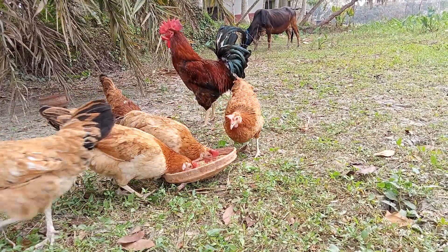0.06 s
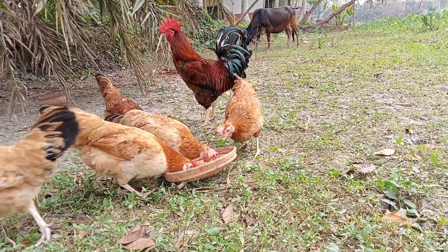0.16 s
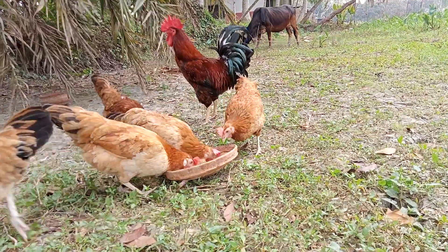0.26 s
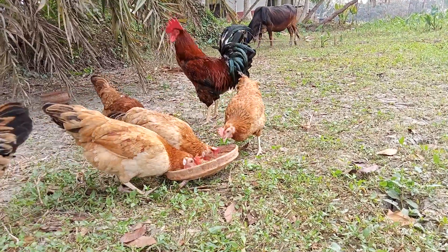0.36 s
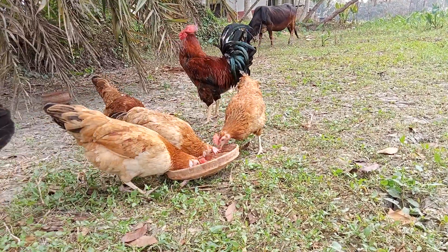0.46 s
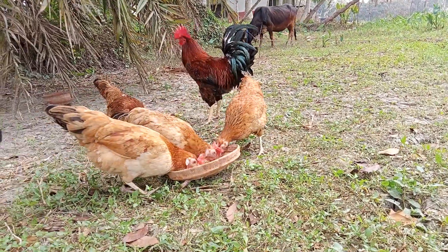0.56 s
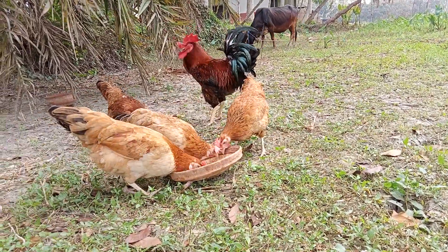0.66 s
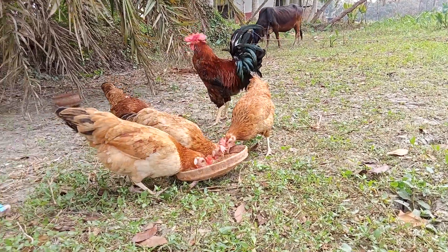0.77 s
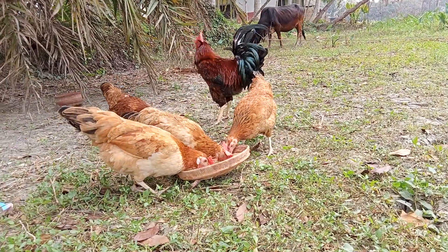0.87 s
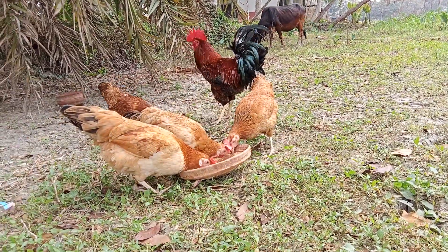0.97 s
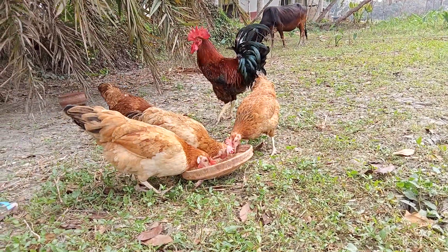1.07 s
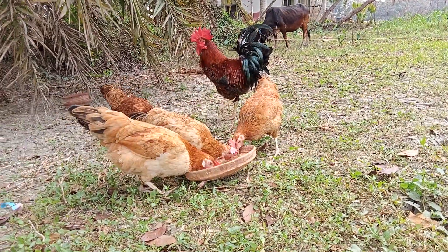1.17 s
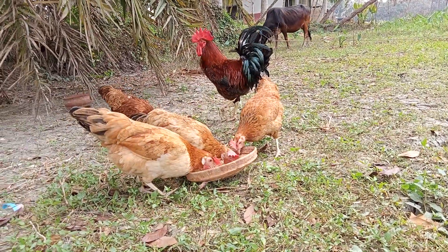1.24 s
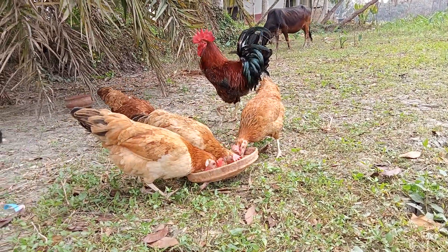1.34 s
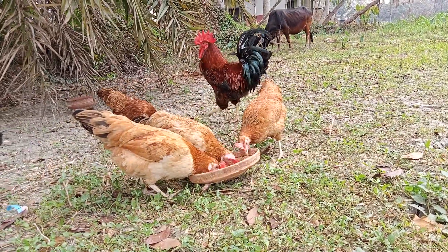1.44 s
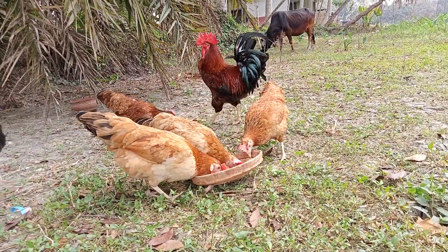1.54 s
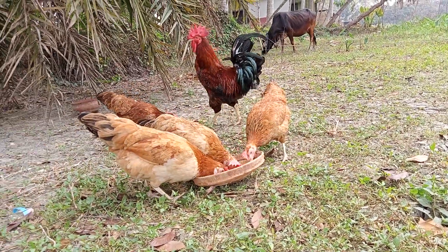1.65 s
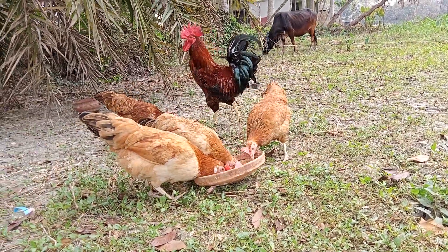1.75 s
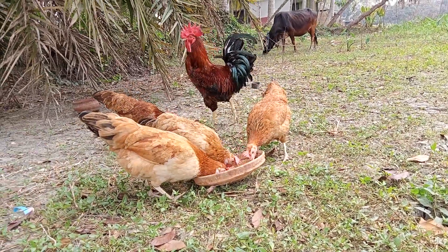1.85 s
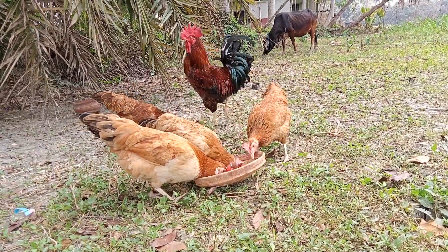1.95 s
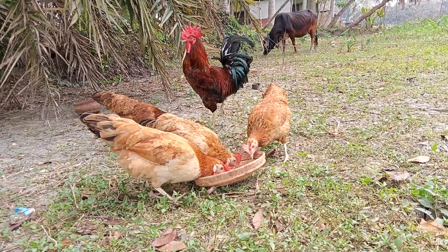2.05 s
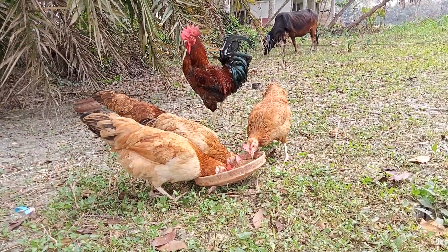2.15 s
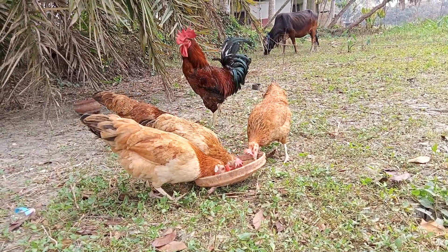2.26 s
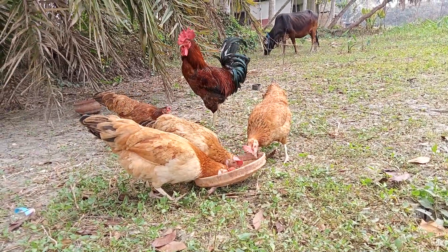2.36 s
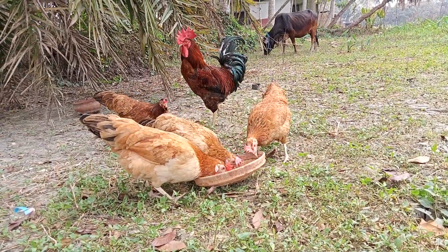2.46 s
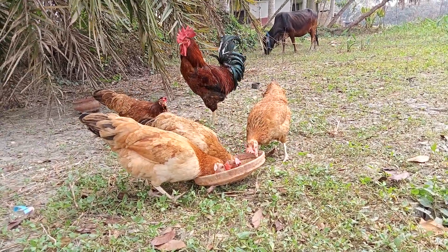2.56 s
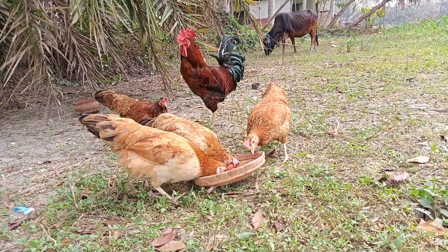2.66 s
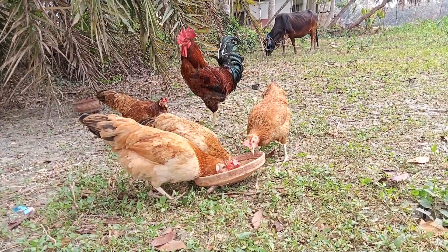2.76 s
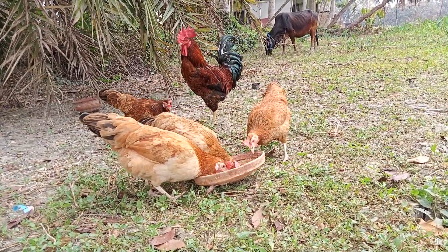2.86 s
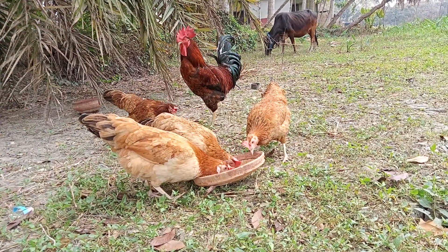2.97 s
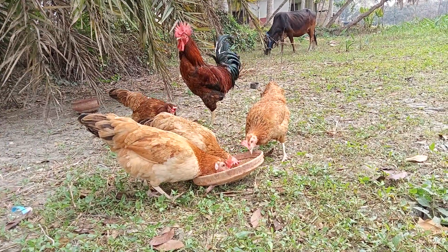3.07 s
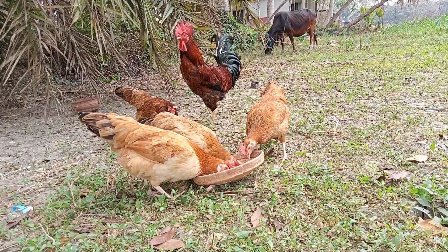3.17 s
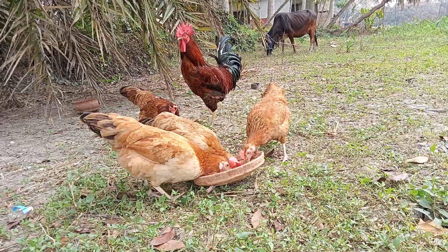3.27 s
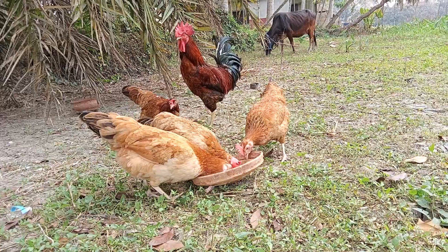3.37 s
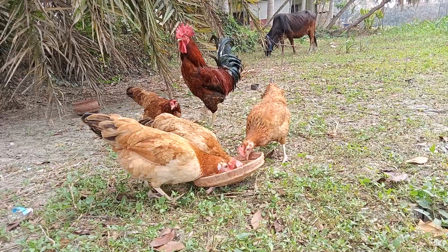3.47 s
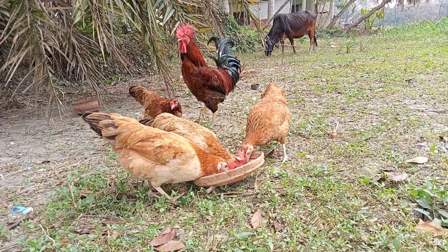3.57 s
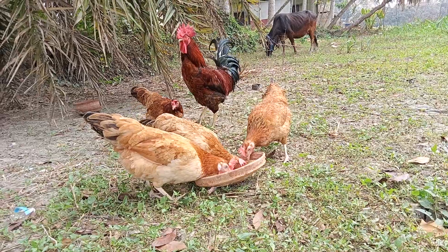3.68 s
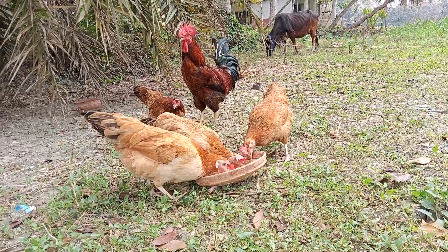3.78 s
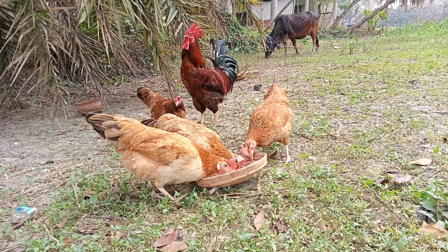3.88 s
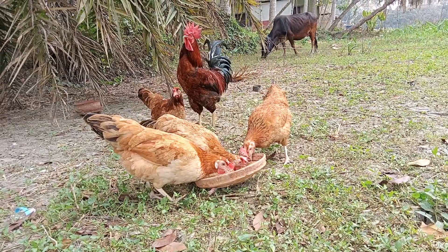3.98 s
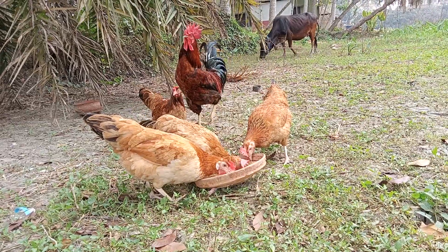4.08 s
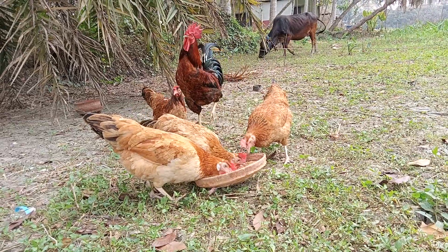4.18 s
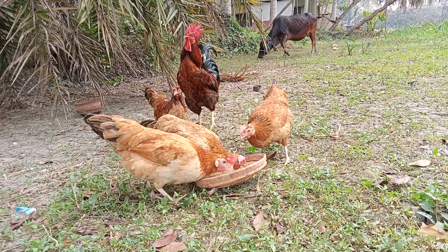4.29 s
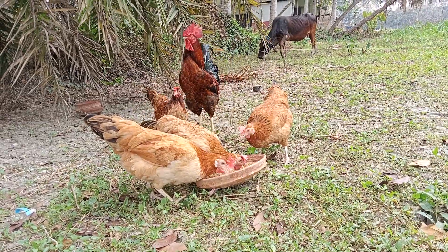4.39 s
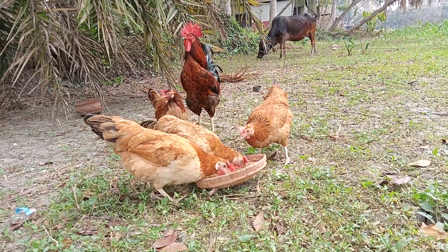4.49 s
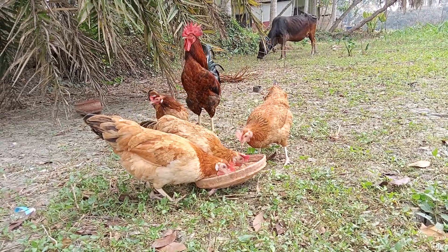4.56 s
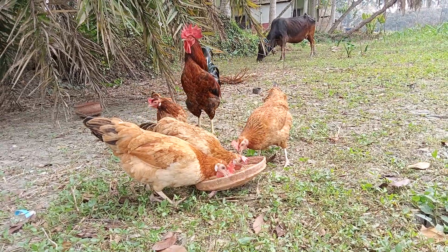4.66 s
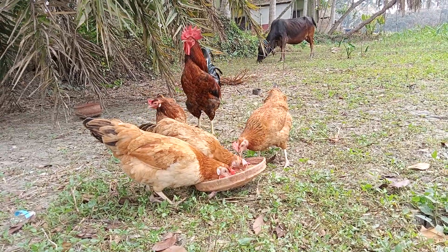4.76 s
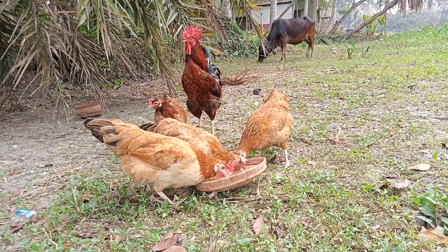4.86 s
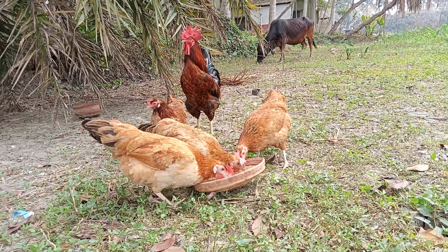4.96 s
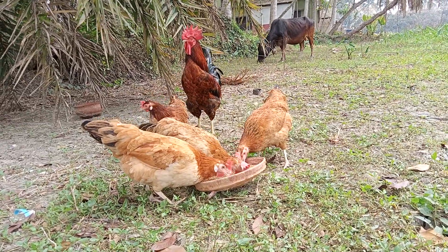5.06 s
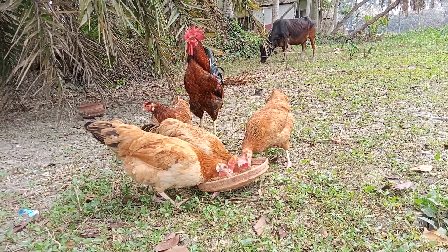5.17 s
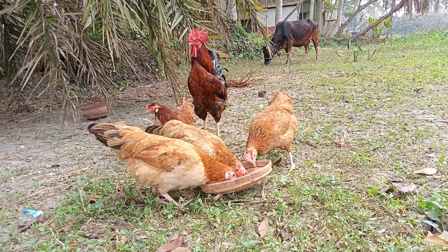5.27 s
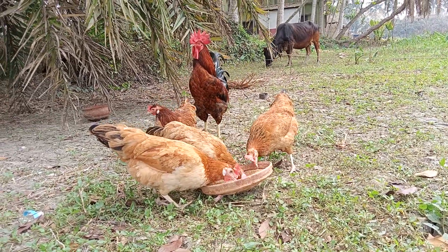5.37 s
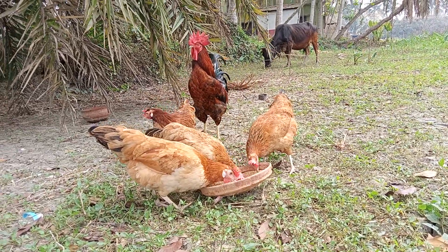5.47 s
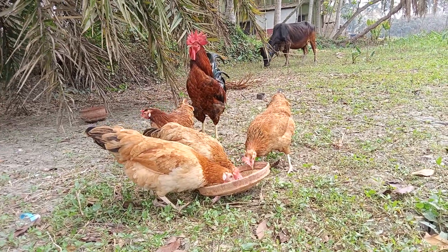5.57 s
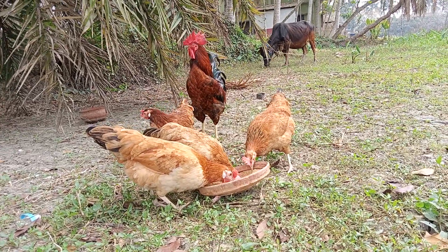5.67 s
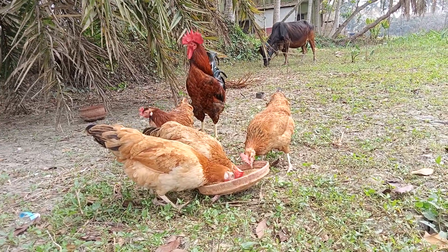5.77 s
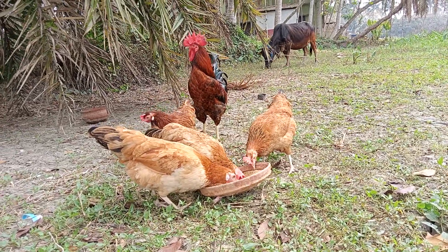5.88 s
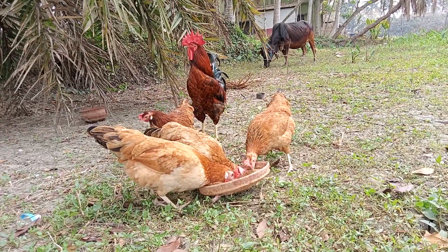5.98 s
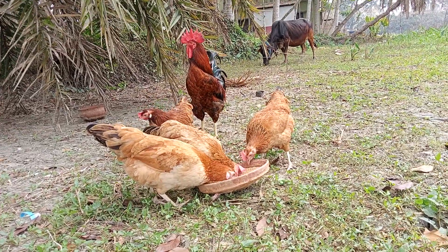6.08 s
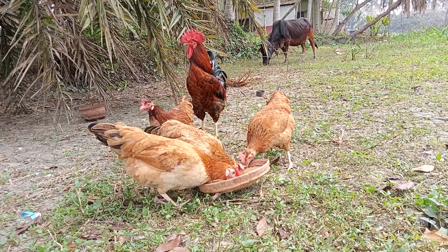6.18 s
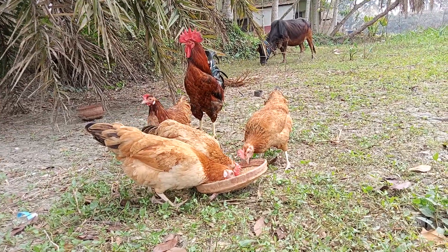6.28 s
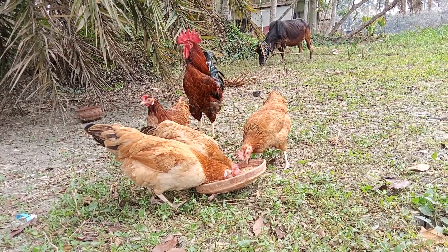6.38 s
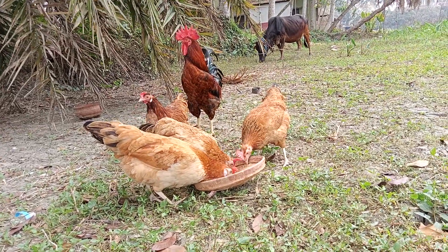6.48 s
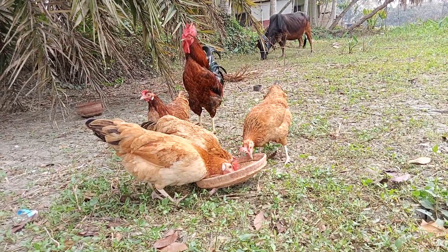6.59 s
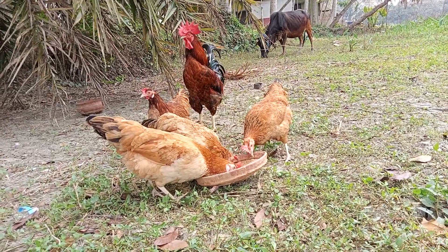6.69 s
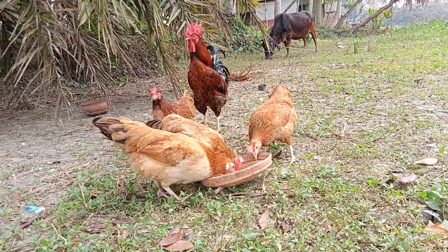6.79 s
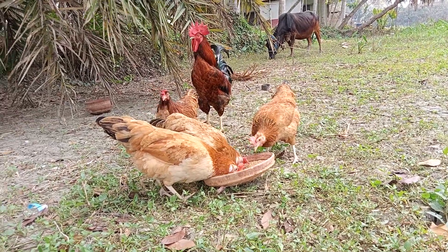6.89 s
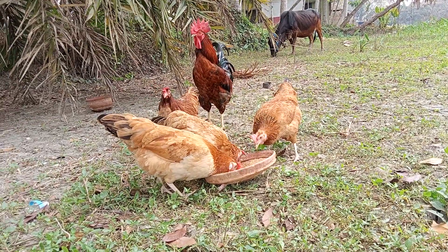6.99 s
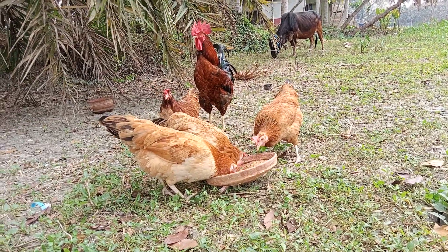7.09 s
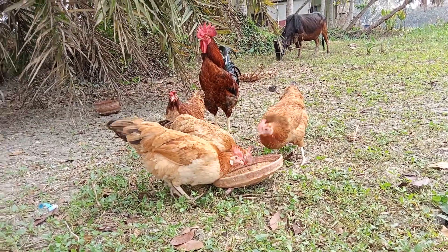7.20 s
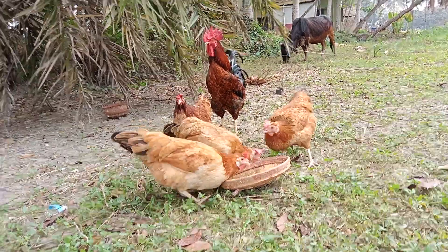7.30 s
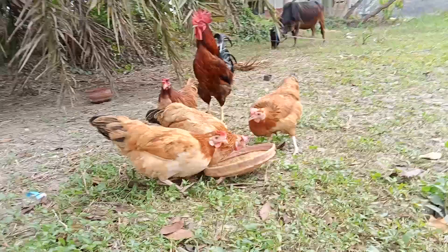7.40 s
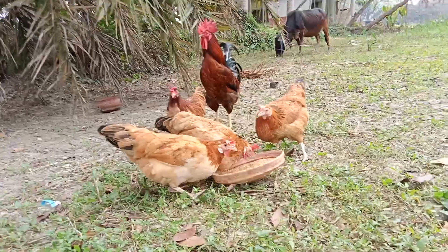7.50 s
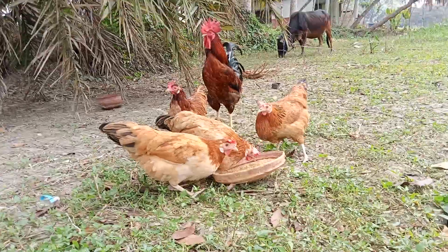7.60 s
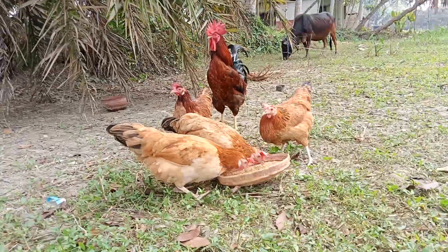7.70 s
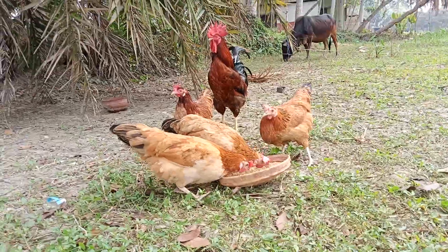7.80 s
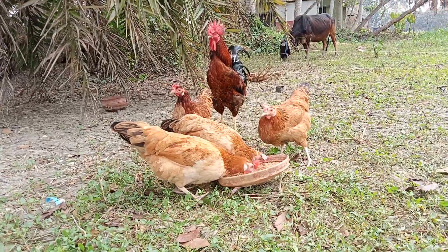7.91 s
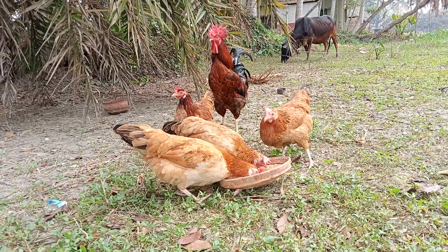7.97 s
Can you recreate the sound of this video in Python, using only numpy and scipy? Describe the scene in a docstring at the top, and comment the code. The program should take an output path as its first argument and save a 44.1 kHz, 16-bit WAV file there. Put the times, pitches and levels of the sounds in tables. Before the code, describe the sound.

Hens peck at feed in a clay bowl and scuff through dry grass, making light taps and crackles. A young bird gives raspy, falling peeps about once a second, while a far bird repeats a quick three-note call and a slow engine chugs faintly. One hen clucks softly. The pecking sharpens midway, and near the end a short thump hits the microphone, followed by busier rustling and peeps.

```python
"""In a yard, hens rustle through dry grass and peck at a clay feed bowl; one gives a low cluck.
A young bird peeps in falling whistles, made raspy by a second, slower vibration in its voice box;
another bird adds a few lower peeps.
Far off a bird repeats a three-note call and a slow engine, perhaps a pump, chugs on.
Near the end something knocks the microphone, and its limiter turns the yard down for a moment."""
import sys
import numpy as np
from scipy import signal
from scipy.fft import rfft, irfft, next_fast_len
from scipy.io import wavfile
from scipy.ndimage import uniform_filter1d, minimum_filter1d

SR = 44100
rng = np.random.default_rng(int(sys.argv[2]) if len(sys.argv) > 2 else 0)


def unload_audio(sound):
    """Save the sound as a 16-bit wav file, at the path given as the first command line argument."""
    columns = np.transpose(np.atleast_2d(sound))
    # keep every value between -1 and 1, then stretch to whole-number steps
    steps = np.round(np.clip(columns, -1, 1) * 32767)
    wavfile.write(sys.argv[1], SR, steps.astype(np.int16))


N = 354563


def amp(db):
    """Turns decibels into a number to multiply by."""
    return 10 ** (np.asarray(db) / 20)


def unit(x):
    """Scales a sound to an average power of 1."""
    return x / np.sqrt(np.mean(x ** 2) + 1e-20)


def clock(length_s):
    """The time of each sample, in seconds."""
    return np.arange(int(length_s * SR)) / SR


def add(mix, start_s, sound):
    """Mixes a sound in at the given time."""
    part = mix[max(round(start_s * SR), 0):][:len(sound)]
    part += sound[:len(part)]


def colour(x, points):
    """Makes some frequencies stronger and others weaker, along (frequency_hz, level_db) points."""
    hz, db = np.transpose(points)
    size = next_fast_len(len(x))
    gain = amp(np.interp(np.log(np.fft.rfftfreq(size, 1 / SR) + 1), np.log(hz), db))
    return irfft(rfft(x, size) * unit(gain), size)[:len(x)]


def let_through(x, kind, hz, order=2):
    """Keeps the "low", "high" or "band" part of a sound; a higher order cuts more sharply."""
    return signal.sosfilt(signal.butter(order, hz, kind, fs=SR, output="sos"), x)


def drift(t, per_s):
    """A random wobble of about size 1 that heads for a new value per_s times a second."""
    return 1.34 * np.interp(t * per_s, np.arange(4096), rng.standard_normal(4096))


def ring(x, hz, width_hz):
    """Makes a sound ring at one pitch; a narrower width rings longer."""
    r = np.exp(-np.pi * width_hz / SR)
    return signal.lfilter([1 - r, 0, r - 1], [1, -2 * r * np.cos(2 * np.pi * hz / SR), r * r], x)


def outdoors(x, echo_db, fade_s):
    """Adds thin echoes from trees and walls. Here and below, fade_s is the time to fall by 60 dB."""
    t = clock(.6)
    echoes = rng.standard_normal(len(t)) * (rng.random(len(t)) < .04)
    tail = echoes * amp(-60 * t / fade_s) * (t > .006)
    return x + amp(echo_db) * signal.oaconvolve(x, tail / np.linalg.norm(tail))[:N]


# Tone of the air, with the microphone's high ring near 8.7 kHz: frequency_hz, level_db
AIR_AND_MIC_TONE = [(20, -28), (45, -9), (75, 13.5), (140, 11), (250, 5), (420, 0), (680, 0), (1300, 3),
                    (1900, 1.5), (3100, -0.5), (4200, -9.5), (5600, -24.5), (7600, -27), (8700, -16.5),
                    (10200, -39), (12500, -37), (16000, -27)]

def yard_air(level_db=-57.5):
    """The steady wash of the open yard, wavering a little."""
    loudness = amp(level_db + .89 * drift(np.arange(N) / SR, 7.4))
    return loudness * unit(colour(rng.standard_normal(N), AIR_AND_MIC_TONE))


# Two strokes and their echoes in each turn of the engine: delay_s, level_db
ENGINE_STROKES = [(-.004, 0), (0.018, -13), (0.033, -3.5), (0.066, -11)]
# The notes the exhaust pipe rings at: pitch_hz, level_db, fade_s
PIPE_NOTES = [(88.5, -11.5, 0.14), (141.2, -1.5, 0.13), (188.4, 4, 0.037), (230, -4, 0.023)]
# The tone of the rushing gas: frequency_hz, level_db
GAS_COLOUR = [(30, -57), (60, -16), (100, 5), (145, 2), (200, 2.5), (260, -4), (340, -14.5), (480, -18.5),
              (900, -42), (5000, -100)]
# Metal knocks in each turn: delay_s, level_db
VALVE_KNOCKS = [(.003, 2), (.031, 3.5), (.053, -1.5)]
# The notes the engine's metal case rings at: pitch_hz, width_hz, level_db
CASE_NOTES = [(760, 10.8, -70), (895.5, 33, -67.5), (971, 34, -72), (1406, 30, -71)]

def engine(exhaust_db=-53, turns_per_s=11.8835, gas_db=-5, gas_peak_s=.0073, uneven_db=1.13):
    """A slow one-cylinder engine: puffs of gas ring the exhaust pipe, and the valves rattle the case."""
    puffs, rattle, t = np.zeros(N), np.zeros(N), clock(.11)
    pipe = sum(amp(db - 60 * t / fade_s) * np.sin(2 * np.pi * hz * t) for hz, db, fade_s in PIPE_NOTES)
    pipe *= 1 - np.exp(-t / .0038)  # a soft start
    gas = unit(colour(rng.standard_normal(N + SR), GAS_COLOUR))
    swell = np.e * t / gas_peak_s * np.exp(-t / gas_peak_s)
    fade = 1 - (t / t[-1]) ** 4
    for turn_s in np.arange(0, N / SR, 1 / turns_per_s):
        for delay_s, db in ENGINE_STROKES:
            louder, later = rng.standard_normal(2)  # no two strokes are quite alike
            rush = gas[rng.integers(N):][:len(t)]
            puff = (pipe + amp(gas_db) * rush * swell) * fade
            add(puffs, turn_s + delay_s + .00059 * later, amp(db + uneven_db * louder) * puff)
        for delay_s, db in VALVE_KNOCKS:
            add(rattle, turn_s + delay_s, amp(db - 12.7 * t / .0029) * rng.standard_normal(len(t)))
    case = sum(amp(db) * unit(ring(ring(rattle, hz, width_hz), hz, 5 * width_hz))
               for hz, width_hz, db in CASE_NOTES)
    return amp(exhaust_db) * unit(puffs) + case


# Scuffs of a foot in the grass or a beak in the feed: peak_s, length_s, level_db
GRASS_SCUFFS = [(0.016, 0.35, -63), (0.493, .25, -72), (1.248, 0.16, -63.5), (1.53, .25, -70),
                (1.617, 0.048, -61.5), (1.76, 0.14, -65.5), (1.93, .12, -66), (2.211, .45, -72),
                (2.624, 0.057, -62.5), (2.793, 0.045, -66), (3.222, 0.1, -61), (3.413, 0.24, -65),
                (3.59, 0.31, -66.5), (3.83, .09, -58), (3.99, .08, -65.5), (4.071, .08, -54),
                (4.416, .09, -63.5), (4.59, 0.2, -67.5), (4.971, .3, -66), (5.092, 0.16, -59),
                (5.599, 0.26, -61), (5.7, 0.24, -55.5), (6.002, .08, -68.5), (6.933, 0.15, -66),
                (7.043, 0.15, -55), (7.111, 0.079, -47.5), (7.16, 0.18, -54), (7.41, 0.2, -64.5),
                (7.622, 0.086, -46), (7.684, 0.52, -60), (7.872, 0.23, -59.5), (8.035, .05, -63)]

def scuffing(stir_db=-80, rise_share=.44, depth_db=19):
    """How loud the rustle is: each scuff swells and dies away over the flock's faint stirring."""
    t = np.arange(N) / SR
    power = amp(stir_db + 2.5 * drift(t, 20)) ** 2
    for peak_s, length_s, db in GRASS_SCUFFS:
        # 0 at the scuff's peak, 1 at its start and end
        away = np.maximum((peak_s - t) / rise_share, (t - peak_s) / (1 - rise_share)) / length_s
        power += amp(db - depth_db * np.minimum(away, 10)) ** 2
    return np.sqrt(power)


# Tone of dry grass and feed, with the microphone's high ring near 8.8 kHz: frequency_hz, level_db
GRASS_AND_MIC_TONE = [(300, -12), (1500, 1), (3000, 2.5), (4300, 2), (5600, -3.5), (7700, -2.5), (8800, 5),
                      (10200, -3), (12500, -5.5), (15300, -3)]

def rustling(grains_per_s=1300, grain_s=.0005, patch_db=3):
    """Dry grass and feed crackle in tiny grains of sound; each clump of grains has its own tone."""
    sizes = amp(3.8 * np.minimum(rng.exponential(1, N), 3.5))
    clicks = sizes * (rng.random(N) < grains_per_s / SR)
    burst_power = signal.lfilter([1], [1, -np.exp(-1 / (grain_s * SR))], clicks ** 2)
    grains = unit(np.sqrt(burst_power) * rng.standard_normal(N))
    hiss = .4 * rng.standard_normal(N)
    # turn random patches of frequency and time up or down
    spectrum = signal.stft(grains + hiss, nperseg=256)[2]
    patches = uniform_filter1d(rng.standard_normal(spectrum.shape), size=5, axis=0)
    patches = uniform_filter1d(patches, size=6, axis=1)
    crackle = signal.istft(spectrum * amp(patch_db * unit(patches)), nperseg=256)[1][:N]
    return scuffing() * unit(colour(crackle, GRASS_AND_MIC_TONE))


def peep(length_s, start_hz, end_hz, rasp, bend=1, buzz_hz=196.4):
    """One whistle; a slower vibration in the bird's voice box adds side tones, buzz_hz apart."""
    t = clock(length_s)
    progress = t / length_s
    hz = end_hz + (start_hz - end_hz) * (1 - progress) ** bend
    hz *= 1 + (.004 + .005 * rasp) * drift(t, 400)
    phase = 2 * np.pi * np.cumsum(hz) / SR
    buzz = 2 * np.pi * np.cumsum(buzz_hz * (1 + .09 * drift(t, 200))) / SR
    # the rasp widens as the pitch falls; a squeak on one pitch is wide throughout
    spread = np.maximum((1 + 2 * progress) / 3, start_hz == end_hz)
    tones = [(-1, .5 * rasp * spread), (0, 1), (1, 1.35 * rasp),
             (2, 1.1 * rasp ** 2 * spread), (3, .5 * rasp ** 2 * spread ** 2)]
    voice = sum(size * (1 + .28 * drift(t, 160)) * np.sin(phase + k * buzz) for k, size in tones)
    swell = np.sin(np.pi * progress ** 1.2) ** .55
    return unit(voice * swell)


# Peeps of a young bird, with a few lower ones from another bird: start_s, length_s, start_hz, end_hz,
# level_db, rasp (0-1), bend (higher flattens the fall sooner), squeak_before (0-1), squeak_after (0-1)
BIRD_PEEPS = [(0.185, .14, 3277, 2403, -49.5, .6, 1.84, 0.37, 0.38),
              (0.956, 0.13, 3300, 2470, -48, 0.63, 1.86, 0.29, 0.16),
              (2.064, .13, 3314, 2347, -48, 0.7, 1.56, .42, .33),
              (2.965, .07, 2620, 2540, -56, .96, 1, 0, 0),
              (4.154, .17, 3290, 2370, -52, 0.66, 1.86, 0.37, 0.04),
              (5.164, .14, 3273, 2520, -45.5, .65, 2.4, .18, .14),
              (6.286, 0.092, 3150, 2736, -52, 0, 2.7, 0.39, 0),
              (6.338, 0.058, 2350, 2030, -56.5, 1, 1.5, 0, 0),
              (6.765, .16, 2420, 1536, -56.5, .4, 1.8, 0, 0.1),
              (6.842, .094, 2480, 2260, -56.5, 0.34, 1.05, 0, 0),
              (7.157, .053, 2460, 2196, -53, .5, 1.44, 0, .35),
              (7.198, .11, 1980, 1807, -57.5, 1, 3.4, 0, 0.1),
              (7.494, 0.11, 3346, 2735, -51.5, 0.1, 3.3, 0.57, 0),
              (7.567, 0.056, 2300, 1832, -53, .7, 1.2, 0, 0),
              (7.838, .077, 3740, 3460, -53.5, 0, 1.8, 0, 0)]

def peeping_birds():
    """Falling, raspy peeps, many with a thin squeak just before or after."""
    out = np.zeros(N)
    for start_s, length_s, start_hz, end_hz, db, rasp, bend, before, after in BIRD_PEEPS:
        add(out, start_s, amp(db) * peep(length_s, start_hz, end_hz, rasp, bend))
        lead_hz = .805 * start_hz
        lead = peep(.125, lead_hz, lead_hz, rasp=.96, buzz_hz=275)
        add(out, start_s - .104, before * amp(db) * lead)
        trail = peep(.054, end_hz, end_hz, rasp=.5)
        add(out, start_s + length_s - .006, after * amp(db) * trail)
    through_throat = let_through(out, "low", 3500, order=6)
    return outdoors(through_throat, echo_db=-6, fade_s=.45)


def faint_taps(per_s=7, level_db=-58, spread_db=3, dullest_db=-22):
    """Light taps at random moments, as rows of start_s, level_db, treble_db."""
    draws = rng.random((round(per_s * N / SR), 3))
    return [(when * N / SR, level_db + spread_db * (2 * size - 1), dullest_db * dull)
            for when, size, dull in draws]


# Sharp taps of beaks and snaps of dry stalks: start_s, level_db, treble_db (both relative)
BEAK_TAPS = [(.1506, -47, -11), (1.7457, -40.5, -24), (3.191, -51, -13), (4.0412, -45, -15),
             (4.0594, -41.5, -15), (4.2821, -41, -30), (4.3088, -30, -30), (4.3326, -27, -3),
             (4.6106, -44, -33), (5.091, -44, -22), (5.1857, -45, -18), (5.689, -37.5, -35),
             (5.697, -35, -22), (6.977, -24.5, -12), (7.0604, -32.5, -40), (7.0883, -38, -14),
             (7.117, -43, 7), (7.1255, -35, -21), (7.15, -36.5, -13), (7.374, -45, -25),
             (7.6188, -26.5, -13)]
# Tone of the taps, with the microphone's high ring near 8.8 kHz: frequency_hz, level_db
TAP_AND_MIC_TONE = [(500, -9), (1500, -4), (2500, 3.5), (4000, 2.5), (6000, -11.5), (7500, -2), (8800, 3),
                    (10500, -4), (15000, 5.5)]
# Short dull pecks, and one brief bird chip near 3 kHz: start_s, level_db (relative), pitch_hz
PECKS_AND_CHIP = [(.539, -53.5, 1330), (1.289, -50.5, 2200), (1.746, -57.5, 3200), (3.099, -45.5, 3030),
                  (3.505, -53.5, 2380), (4.059, -53.5, 850), (4.06, -51, 2250), (4.855, -54, 1960),
                  (7.086, -46.5, 704)]

def pecking(tap_fade_s=.018, peck_fade_s=.062, treble_hz=5000):
    """Beaks snap on grain and stalks; narrow bursts of noise make dull pecks and one bird chip."""
    taps, pecks, t = np.zeros(N), np.zeros(N), clock(.04)
    for start_s, db, treble_db in BEAK_TAPS + faint_taps():
        splintering = amp(-60 * t / tap_fade_s) + .037 * amp(-60 * t / .049)
        snap = rng.standard_normal(len(t)) * splintering
        snap[0] += 3.5  # the crack of first contact
        body = let_through(snap, "low", treble_hz)
        treble = let_through(snap, "high", treble_hz)
        add(taps, start_s, amp(db + 2) * (body - amp(treble_db - 1.5) * treble))
    for start_s, db, hz in PECKS_AND_CHIP:
        burst = rng.standard_normal(len(t)) * amp(-60 * t / peck_fade_s) * (1 - np.exp(-t / .002))
        note = let_through(burst, "band", [.87 * hz, 1.15 * hz], order=4)
        add(pecks, start_s, amp(db + 7.5) * note / abs(note).max() * (1 - t / t[-1]))
    return outdoors(colour(taps, TAP_AND_MIC_TONE) + pecks, echo_db=-17, fade_s=.085)


# The far bird's calls: start_s, level_db (relative), last_note_falls (1 falls, 0 arches)
FAR_CALLS = [(.462, -49, 1), (1.222, -50, 0), (3.334, -49.5, 1), (4.102, -48, 0), (4.843, -49, 0),
             (5.597, -49, 0), (6.344, -48, 0), (7.098, -45, 0), (7.846, -50.5, 0)]
# Its two falling notes and its arching one: length_s, start_hz, middle_hz, end_hz, level_db (relative)
CALL_NOTES = [(0.0357, 1370, 1255, 680, 0), (0.0349, 1210, 1090, 715, -2), (0.046, 736, 1285, 1040, -6)]

def far_bird(note_delays_s=(0, .0635, .131)):
    """Three quick, nearly pure notes heard through the trees: two fall, the last falls or arches."""
    out = np.zeros(N)
    high_fall, low_fall, arch = CALL_NOTES
    for start_s, db, last_note_falls in FAR_CALLS:
        notes = high_fall, low_fall, low_fall if last_note_falls else arch
        for delay_s, (length_s, *pitches_hz, note_db) in zip(note_delays_s, notes):
            t = clock(length_s)
            progress = t / length_s
            hz = np.polyval(np.polyfit([0, .5, 1], pitches_hz, 2), progress)
            hz *= 1 + .011 * rng.standard_normal()  # each note is slightly off pitch
            swell = np.interp(progress, [0, .25, .4, .55, .7, 1], [0, .35, 1, .85, .35, 0])
            flutter = amp(1.5 * drift(t, 200))
            tone = np.sin(2 * np.pi * np.cumsum(hz) / SR)
            add(out, start_s + delay_s, amp(db + note_db - 1) * unit(swell * flutter * tone))
    return outdoors(out, echo_db=-6.5, fade_s=.45)


# Puffs of air on the microphone: start_s, length_s, level_db
BREEZE_PUFFS = [(0.825, 0.086, -44), (0.914, 0.086, -44), (4.484, 0.039, -47.5), (7.095, 0.049, -43)]

def breeze():
    """Air swirls against the microphone in short, low rumbles."""
    out = np.zeros(N)
    rumble_colour = [(25, -32), (60, -11.5), (95, -2.5), (150, -17), (300, -32.5), (1500, -79)]
    for start_s, length_s, db in BREEZE_PUFFS:
        swirl = colour(rng.standard_normal(SR), rumble_colour)[:int(length_s * SR)]
        add(out, start_s, amp(db) * unit(swirl * signal.windows.tukey(len(swirl), .6)))
    return out


# Whistles from farther away: start_s, length_s, start_hz, end_hz, level_db
FAR_WHISTLES = [(2.38, 0.24, 3160, 3140, -70.5), (2.547, 0.16, 3130, 2610, -65.5),
                (5.884, 0.45, 3270, 3080, -71), (6.403, 0.39, 2790, 2680, -74)]

def far_whistles():
    """Faint, long bird whistles that sink in pitch and echo around the yard."""
    out = np.zeros(N)
    for start_s, length_s, start_hz, end_hz, db in FAR_WHISTLES:
        add(out, start_s, amp(db) * peep(length_s, start_hz, end_hz, rasp=.6, buzz_hz=90))
    return outdoors(out, echo_db=-5, fade_s=.63)


# Points along one soft cluck: time_s, pitch_hz, level_db
CLUCK_SHAPE = [(2.476, 252, -66), (2.49, 306.4, -48.5), (2.503, 273, -54), (2.515, 271, -56),
               (2.524, 260, -74)]
# How the hen's throat shapes her voice: frequency_hz, level_db
HEN_THROAT = [(250, -9), (310, 6.5), (400, -14), (510, -2), (555, 2.5), (620, -19), (900, -21), (1500, -32)]

def hen_cluck():
    """One low cluck; its overtones grow and fade as they slide past the pitches the throat rings at."""
    times_s, hz, db = np.transpose(CLUCK_SHAPE)
    t = times_s[0] + clock(times_s[-1] - times_s[0])
    pitch_hz = np.interp(t, times_s, hz)
    phase = 2 * np.pi * np.cumsum(pitch_hz) / SR
    throat_hz, throat_db = np.transpose(HEN_THROAT)
    voice = sum(amp(np.interp(k * pitch_hz, throat_hz, throat_db)) * np.sin(k * phase)
                for k in range(1, 5))
    out = np.zeros(N)
    add(out, times_s[0], amp(np.interp(t, times_s, db)) * unit(voice))
    return out


def microphone_knock(start_s=6.9561, gain_db=13.5, bass_cut_hz=78):
    """A sudden step in pressure with a thin tick; the microphone's bass cut makes it a short thump."""
    t, out = clock(.08), np.zeros(N)
    step = let_through(np.ones(len(t)), "low", 2900, order=5)
    thump = let_through(let_through(step, "high", bass_cut_hz), "high", bass_cut_hz)
    tick_colour = [(2000, -7), (4300, 2), (5800, -11.5), (7500, -3),
                   (8700, -1), (11000, -9), (14000, -2), (16000, -20)]
    tick = colour(rng.standard_normal(len(t)), tick_colour) * np.exp(-t / .0006)
    add(out, start_s, amp(gain_db) * (thump + .11 * tick))
    return out


def sizzle(start_s=7.605, length_s=.36, pitch_hz=8900, width_hz=650, level_db=-65.5):
    """A thin, fluttering high ring that runs through the last scuffs."""
    t, out = clock(length_s), np.zeros(N)
    hiss = unit(ring(ring(rng.standard_normal(SR), pitch_hz, width_hz), pitch_hz, width_hz))[:len(t)]
    flutter = amp(level_db + 2.5 * drift(t, 70))
    add(out, start_s, flutter * hiss * signal.windows.tukey(len(t), .2))
    return out


def scene():
    """The whole yard at one microphone, with the deepest bass of the engine and air cut away."""
    background = let_through(engine() + yard_air() + breeze(), "high", 42, order=3)
    birds = rustling() + peeping_birds() + pecking() + far_bird() + far_whistles() + hen_cluck()
    return (background + birds + microphone_knock() + sizzle())[None]


def record(dry, ceiling=.89, top_hz=15650):
    """A limiter briefly turns things down from just before a loud peak; then the top treble is cut."""
    needed_gain = np.minimum(1, ceiling / (abs(dry[0]) + 1e-9))
    held_gain = minimum_filter1d(needed_gain, size=2401, origin=700)  # held for about 54 ms
    limited = dry * uniform_filter1d(held_gain, size=900)
    treble_cut = signal.firwin(511, top_hz, window=("kaiser", 9), fs=SR)
    return signal.oaconvolve(limited, treble_cut[None], "same")


dry = scene()
out = record(dry)
unload_audio(out)
```